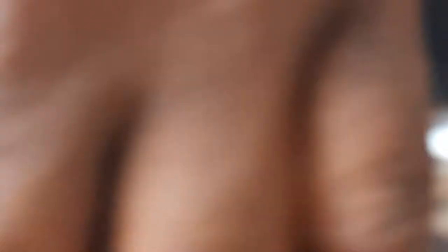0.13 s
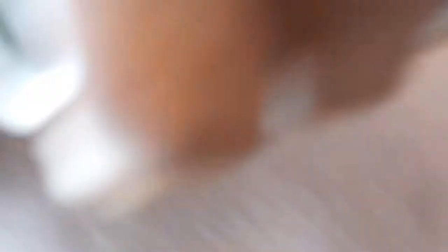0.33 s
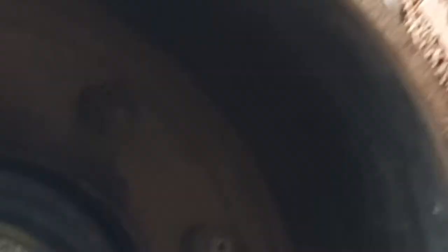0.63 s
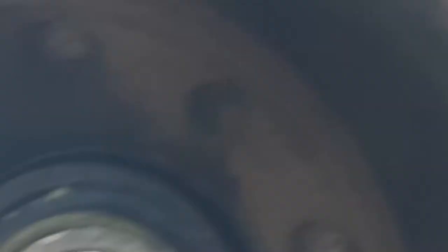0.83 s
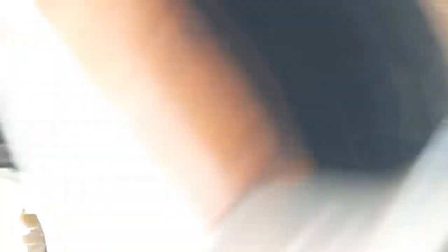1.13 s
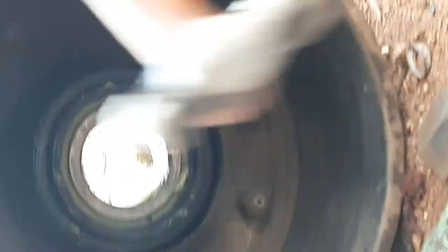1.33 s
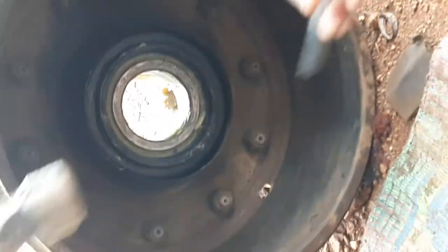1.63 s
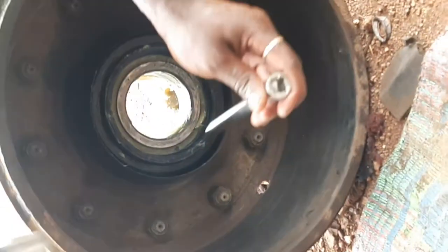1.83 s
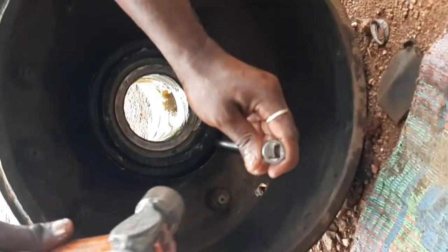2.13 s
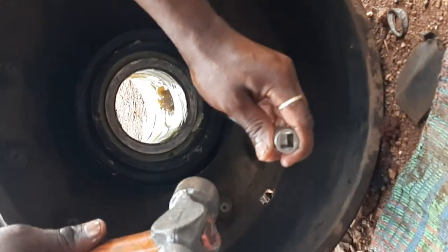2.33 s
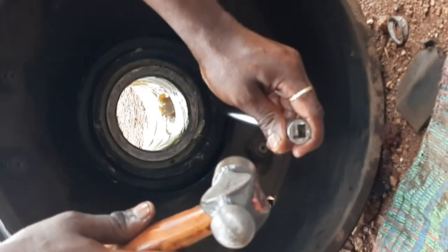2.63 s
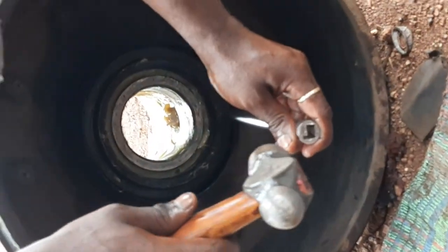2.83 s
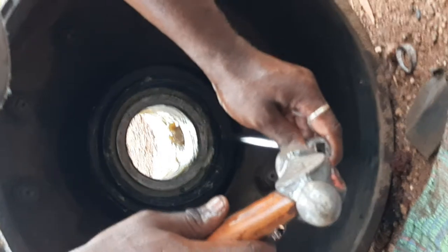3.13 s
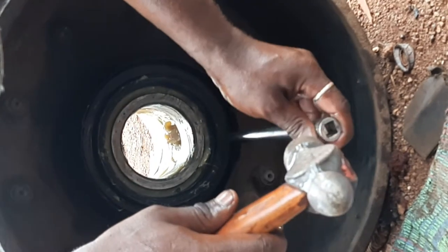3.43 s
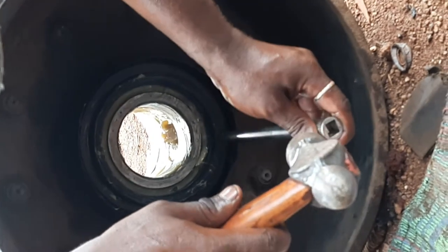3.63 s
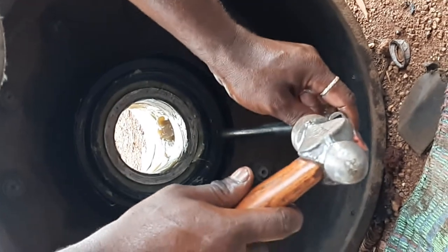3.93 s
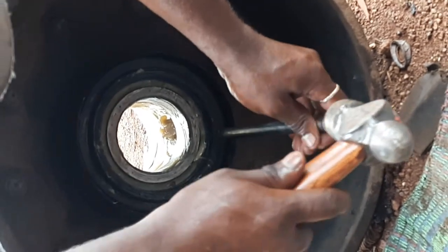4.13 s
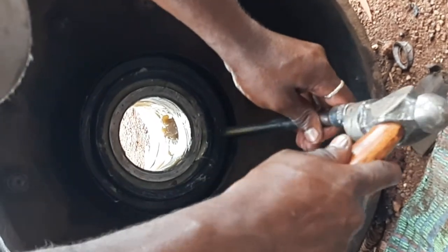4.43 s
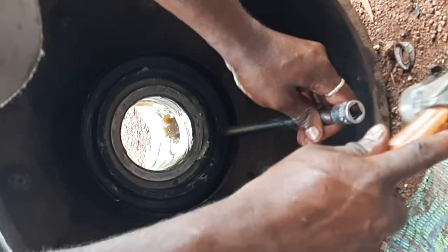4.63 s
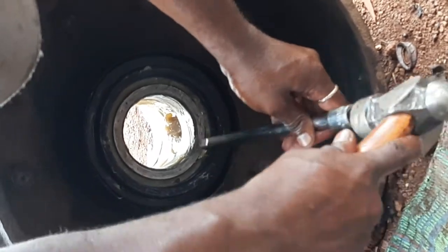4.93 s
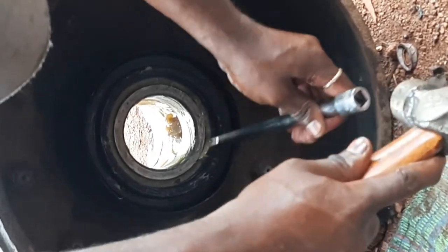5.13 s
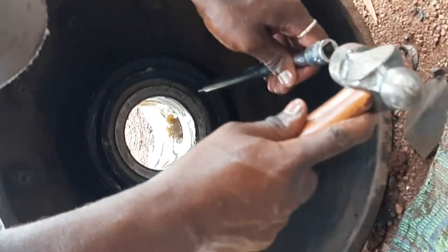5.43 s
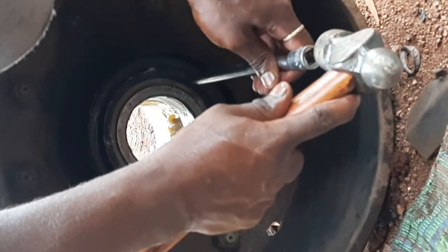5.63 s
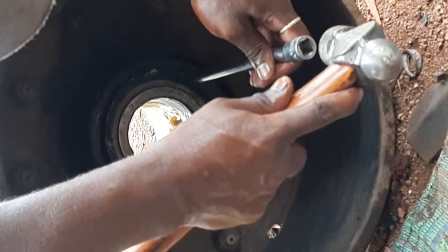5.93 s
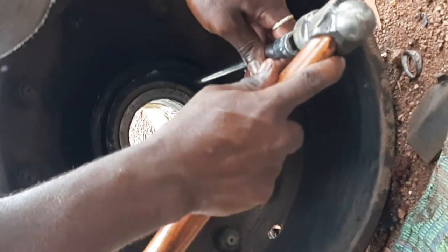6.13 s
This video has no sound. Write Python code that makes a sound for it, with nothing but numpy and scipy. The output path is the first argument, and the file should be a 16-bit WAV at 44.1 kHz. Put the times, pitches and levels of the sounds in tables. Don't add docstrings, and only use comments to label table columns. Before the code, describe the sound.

Close, dry outdoor sound, with low wind rumble and hissy air whose level slowly dips and rises. From 0 to 1 s, fingers rustle, tick and softly thud against the phone, brightest around 0.3-0.8 s. At 1.2 s a hammer hits a steel drift: a loud, sharp clank with a high ring, quickly damped by the grip, and a short hub echo. A faint rising bird chirp comes right after, with weaker ones at 1.6-1.8 s. The background sinks, then returns by 2.5 s with soft bumps. Tiny metal touches come at 2.7, 3.4 and 3.5 s. Two very loud blows land at 4.4 and 4.9 s, the second rattling and ringing longer with a low jolt; a smaller rebound clicks at 5.0 s. The background dips again beneath slight scrapes, then a last lighter clink at 6.1 s is followed by dull handling bumps.

```python
import sys
import numpy as np
from scipy import signal
from scipy.io import wavfile
from scipy.ndimage import uniform_filter1d, minimum_filter1d

SR = 44100
rng = np.random.default_rng(int(sys.argv[2]) if len(sys.argv) > 2 else 0)


def undo_db(level):
    steps = np.asarray(level, float) / 20
    return 10 ** steps


def output_pcm(signal):
    pcm = np.clip(np.atleast_2d(signal).T, -1, 1) * 32767
    wavfile.write(sys.argv[1], SR, np.round(pcm).astype(np.int16))


N = 277389

# (time [s], gain [dB], wind strength [dB])
GAIN_AND_WIND = [(0.0, -3.5, -2), (0.12, 0.5, -5), (0.4, 1.1, -3.5), (0.75, 4.5, -5), (1.05, 5, -5),
                 (1.3, 0, -8.5), (1.42, -4.5, -5.5), (1.701, -11, -0.5), (2.27, -15, 2.5),
                 (2.38, -7.5, 0.5), (2.54, 0, -2), (3.6, -1, 3), (4.451, 0, 1), (4.9, -5, 5),
                 (5.15, -10.5, 1.5), (5.81, -15.5, 2), (6.05, -11, -0.7), (6.2, -3, 2.5)]
# (frequency [Hz], density [dB per Hz])
AIR_COLOUR = [(180, -37), (320, -6), (813, -18.5), (1740, -18.5), (4840, -24.5), (7580, -27), (8600, -36.5),
              (15800, -68.5), (15900, -120)]
# (frequency [Hz], density [dB per Hz])
HISS_COLOUR = [(5060, -29), (8600, -3.5), (15100, -8.5), (15780, -12), (15900, -60.5)]
# (frequency [Hz], density [dB per Hz])
WIND_COLOUR = [(12, -51), (20, -24.5), (109, 2), (189, -0.3), (330, -8), (659, -18), (1200, -21.5),
               (1900, -78)]
# (frequency [Hz], likeness [-1 to 1])
PORT_LIKENESS = [(30, 0.23), (130, 0.86), (300, 0.99), (700, 0.71), (2000, 0.34), (8000, 0.16),
                 (15000, 0.096)]
# (frequency [Hz], width [Hz], boost [dB])
PORT_RESONANCES = [(1320, 270, 3.5), (3710, 320, 3.5), (5000, 670, 3), (7620, 680, 3), (11200, 900, 5)]
PORT_LAG = 10 / 44100
AIR_DB, WIND_DB, HISS_DB = -54.5, -49.5, -75
HISS_SHARE = 0.93
HAND_DB, HAND_UNTIL_S, HAND_LEAVES_S = 5, 0.81, 0.27

# (time [s], length [s], level [dB],
# centre [Hz], width [octaves])
RUBBING = [(0.084, 0.041, -65, 12000, 1.2), (.105, .02, -64, 13600, .05), (0.091, 0.035, -59.5, 5870, .05),
           (0.21, 1, -61, 4350, 0.45), (0.29, 0.088, -61, 7300, 2.5), (0.37, 0.052, -48.5, 2100, 2.5),
           (0.65, 0.025, -58, 5500, 2.2), (0.709, 0.047, -46, 880, 1.7), (0.787, 0.062, -49.5, 9200, 3.3),
           (1.489, 0.081, -72.5, 11960, .6), (5.257, 0.011, -64, 1950, 0.91),
           (5.276, 0.0093, -62.5, 1760, 0.81), (5.468, 0.25, -73, 2500, 0.32),
           (5.504, 0.28, -76, 1880, 0.3), (5.156, 0.022, -73, 2900, .3), (0.782, 0.043, -51.5, 4000, 0.52),
           (0.793, 0.022, -54, 7100, 0.19), (3.28, 0.033, -64, 3100, .3), (5.68, 0.066, -74.5, 1900, .2),
           (1.931, 0.092, -69.5, 830, .4), (2.03, 0.098, -64.5, 760, .9), (2.85, 0.22, -64, 1450, 1.2),
           (.02, 0.092, -78, 1400, 1.7), (2.2, .05, -62, 340, .4), (1.2, .14, -71, 11500, .7),
           (4.43, 0.14, -69, 13000, 0.87), (5.01, .13, -77, 13000, 0.74)]
# (time [s], level [dB])
SKIN_TICKS = [
    (.048, -65),
    (.318, -59),
    (.368, -59),
    (.388, -53),
    (.445, -57),
    (.5, -67),
    (.593, -66),
    (.965, -60),
    (.986, -54),
    (1.032, -67),
]
TICK_S, TICK_HZ, TICK_OCTAVES = 0.0054, 12700, 0.5
# (time [s], peak [dB], frequency [Hz], left-right [dB])
HAND_BUMPS = [(0.519, -34, 185, -3), (0.731, -49, 160, -5), (2.53, -37.5, 165, -2), (2.909, -38.5, 215, -2),
              (3.109, -36, 119, -8), (4.47, -35, 110, -20), (4.524, -33, 129, -16), (4.652, -32, 121, -11),
              (4.781, -45.5, 98, -21), (4.835, -28.5, 133, -3), (4.859, -26.5, 63, 8), (5.116, -45, 124, 7),
              (6.02, -43, 153.7, -11.5), (6.069, -40, 81.5, -10), (6.163, -37, 151, 15),
              (6.208, -31.5, 147, 9), (6.27, -46, 214, -8.5)]

# (time [s], peak [dB], left-right [dB], clatter t60 [s], time until the grip damps the tools [s])
HAMMER_BLOWS = [
    (1.17, -1, -0.5, 0.073, 0.033),
    (2.693, -27, -1.5, 0.047, 0.026),
    (3.425, -31.5, -1.5, 0.076, 0.018),
    (3.519, -40, 1, 0.042, 0.028),
    (4.4013, 5.5, 1, 0.028, 0.034),
    (4.8607, 6, 0, 0.047, 0.03),
    (4.9908, -15, -0.5, 0.043, 0.016),
    (6.122, -12.5, -1, 0.058, 0.036),
]
# (level [dB], t60 [s], left port's lead [radians])
SWING_RINGS = [
    {1138: (-19, 0.055, 0.19), 760: (-30.5, .02, .2), 436: (-42, .15, .1), 4710: (-38, 0.21, 1.1), 5222: (-39, .15, -1.1), 7122: (-35, .1, .6), 4366: (-35.5, 0.29, 4.7), 5599: (-30.5, .1, 0.88), 5885: (-5.5, 0.085, -0.36), 9432: (-25.5, 0.12, 0.96), 9986: (-28, 0.099, -.9), 13547: (-19.5, 0.2, -1.9)},
    {1106: (-42.5, 0.12, -0.32), 2050: (-47, .04, .5), 7250: (-55, .03, .3), 4800: (-46, .06, .6), 1510: (-47, 0.11, 2.6), 3052: (-43, 0.098, -.3), 5020: (-42, 0.04, 0.27), 5290: (-44.5, 0.049, .3)},
    {1128: (-45, 0.13, -.7), 3063: (-52, 0.088, 0.25), 4300: (-43, 0.03, -.7), 4050: (-46, .03, .4), 5450: (-50, 0.04, .3), 7280: (-43, 0.03, .3), 7850: (-47, .025, -.6)},
    {7150: (-53, .025, -.4), 7400: (-55, 0.046, .3)},
]
# (level [dB], t60 [s], left port's lead [radians])
HARD_RINGS = [
    {245: (-31, 0.05, .1), 345: (-29.5, .05, .2), 760: (-29, 0.021, .2), 950: (-22, 0.042, .1), 4610: (-18.5, 0.05, -0.76), 1179: (-15, 0.036, -.1), 1505: (-24.5, 0.041, 1.1), 3100: (-23, 0.12, -1), 4191: (-24.5, 0.069, -1.1), 7149: (-27, .045, .3), 2756: (-26, 0.044, -.6), 7502: (-34, .08, .5), 9425: (-15.5, 0.094, 1.9), 13450: (-30, .075, 1.28), 13180: (-38.5, .07, .4), 12200: (-45, .07, .5)},
    {430: (-32, .025, .2), 900: (-21, 0.022, .2), 1132: (-31, 0.12, -1.4), 1445: (-30, 0.31, 1.36), 2350: (-14.5, 0.0816, 2.2), 3071: (-24.5, 0.19, 1.3), 2580: (-26, 0.044, 0.53), 4140: (-25.5, 0.2, -0.632), 5510: (-26.5, .2, .5), 6100: (-13, 0.069, -0.33), 7504: (-28, 0.2, 0.52), 9426: (-29.5, 0.47, -2.5), 10150: (-33, 0.33, 6.9), 13544: (-29.5, 0.2, 0.54)},
]
# (level [dB], t60 [s], left port's lead [radians])
LIGHT_RINGS = [
    {1132: (-48, 0.27, -.2), 520: (-38, 0.055, .2), 870: (-42, .04, .2), 3063: (-26, 0.42, 2.16), 2000: (-28, 0.011, .3), 5885: (-28, 0.1, 0.89), 9420: (-48, 0.11, .6), 10160: (-42, 0.21, 1.6), 13540: (-43, .08, -.5)},
    {1500: (-27, 0.054, -1.4), 2140: (-27, 0.035, 0.34), 2490: (-23.5, 0.059, -2.5), 2970: (-24, 0.035, -0.49), 3970: (-29, 0.025, .4), 5120: (-32.5, 0.035, .6), 250: (-41, 0.098, .1), 950: (-25.5, 0.02, -0.25), 680: (-36, 0.042, 0.1), 790: (-35, .04, .2), 1120: (-40, 0.045, -.3), 6764: (-50, .05, .5), 4390: (-21.5, 0.032, .1), 6100: (-23, 0.034, 1.46), 9360: (-40, 0.079, -.4), 8220: (-40, 0.047, .3)},
]
# (frequency [Hz], density [dB per Hz])
CLATTER_COLOURS = [
    [(100, -44), (750, -21), (2300, -26.5), (4800, -16), (5900, -8.5), (7200, -20.5), (8500, -43),
     (10000, -24), (14200, -32.5), (15200, -52.5)],
    [(530, -36), (900, -12), (2750, -7), (3060, -30), (4410, -12), (5200, -18), (15000, -34)],
    [(530, -36), (900, -15), (1100, -14), (3100, -9), (6430, -16), (7320, -13), (15000, -37)],
    [(1180, -34), (2000, 3), (5980, -15), (7330, -11), (15000, -26)],
    [(100, -28), (200, -10.5), (538, -15.5), (2450, -5), (4350, -9), (6200, -17.5), (13600, -30.5),
     (14800, -60)],
    [(120, -37), (220, -2.5), (1740, -14), (2290, -5.5), (6050, -8), (8740, -23), (14300, -17),
     (16000, -41.5)],
    [(450, -7), (750, -14), (1900, -4), (5310, -11.5), (5970, -6), (8700, -24), (13800, -38), (16000, -55)],
    [(240, -44), (400, -28), (3530, -7), (5520, -19), (6150, -11), (10500, -21), (12500, -46), (15000, -86)],
]
DRIFT_BOUNCES = {0: [(.015, -14.5), (.026, -13.5)], 1: [(.005, -12)], 2: [(.008, -12)], 4: [(.002, 1.5),
                 (.012, -11.5), (.025, -16.5)], 5: [(.006, -9), (.017, -6.5), (.0225, -12.5), (.028, -8),
                 (.033, -19), (.043, -3.5), (.052, -3)], 7: [(.008, -26), (.035, -33)]}
HUB_MODES = {465: (-24, .3), 545: (-14, .14), 3421: (-12, .17), 3500: (-8, .17), 3583: (-2, .22),
             3655: (-1, .23), 3692: (-3, .22), 3780: (-6, .2), 3865: (-6, .18), 4160: (-11, .15)}
# (thump against blow [dB], thump delay [s], hub ring [dB], top of the rattle [Hz])
BLOW_DRIVE = [
    (-22, 0.0022, -58.5, 12000),
    (-23, .0012, -80, 9000),
    (-17, 0.0015, -85, 7600),
    (-25, .0012, -90, 9000),
    (-29, 0.0012, -38.5, 14000),
    (-19, 0.0014, -18, 14800),
    (-28, .0012, -46.5, 9000),
    (-42, .0012, -67.5, 5600),
]
DAMPING, LEFT_DB = 930, -32.5
# (time [s], rise [s], time until damped [s],
# frequency [Hz] -> (level [dB], t60 [s], left port's lead [radians]))
FURTHER_RINGS = [
    (4.4013, 0.0014, .05, {2540: (-1.5, 0.027, 0.72), 5865: (-8.5, 0.05, -.2)}),
    (1.1702, 0.00035, 0.042, {3063: (-14, .24, .42)}),
    (1.185, 0.0065, 0.074, {9380: (-41.5, 0.17, 1.1), 13540: (-37, 0.14, -1.5), 13650: (-42, .15, 0.67), 11890: (-52, .12, .4), 5890: (-34.5, .15, -.4)}),
    (4.42, 0.0056, .09, {5860: (-32.5, 0.082, -.2), 3600: (-42.5, .25, 0.87), 13430: (-50, .12, 1), 9430: (-49, 0.086, 1.4), 12200: (-59, 0.13, 0.394)}),
    (4.8765, 0.0011, 0.023, {2360: (-19.5, .08, 1.5), 3590: (-19, .09, -.6), 4100: (-22.5, .08, 1.1), 5885: (-19.5, 0.11, 0.53), 1136: (-23.5, .09, -0.64), 6600: (-21.5, 0.0584, 0.79), 13540: (-30, .09, .6)}),
    (4.905, 0.0016, 0.043, {3640: (-28.5, 0.16, .3), 3070: (-32.5, .1, 1.1), 5500: (-37, 0.087, .6), 6050: (-36, .1, -.6)}),
    (6.14, .003, 0.018, {6000: (-43, 0.11, 1.2)}),
    (6.1257, 0.002, 0.19, {3070: (-20, 0.14, -2.54), 11970: (-40, .06, .32), 13571: (-27, 0.058, .1)}),
                 (1.271, .015, 0.058, {5908: (-54, .9, -.4), 3063: (-57, 0.7, .3)}),
    (4.41, .005, 0.046, {1495: (-28, 0.22, 0.6), 3100: (-43.5, .2, 0.33)}),
    (4.866, 0.007, 0.027, {3232: (-25.5, .15, .5), 3390: (-30, .15, -0.521), 4020: (-31.5, .12, 1.204), 4370: (-21, 0.07, -0.84), 4800: (-33, .15, .6), 5250: (-29.5, .15, 1.5), 5890: (-19.5, 0.13, .3), 6620: (-29.5, 0.086, -0.45)}),
    (4.89, .015, .085, {7472: (-56.5, .25, .5), 8231: (-63.5, .25, -0.71), 11040: (-53.5, 0.31, 1.2), 11990: (-56, 0.27, 0.465), 13570: (-53, 0.225, .5), 14350: (-64, 0.38, -.6)}),
    (4.911, 0.007, .2, {465: (-46, .26, .2)}),
    (5.008, 0.004, .07, {3063: (-40, 0.12, 1.6), 13540: (-74, .3, 1.1)}),
]
# (time [s], peak [dB], left [Hz], right [Hz])
PHONE_JOLTS = [
    (1.1703, -29, 200, 260),
    (4.8607, -12.5, 130, 158),
]
# (frequency [Hz], t60 [s])
HUB_DECAY = [(300, 0.5), (1500, 0.21), (2500, 0.17), (3100, 0.12), (4000, 0.26), (8000, 0.15),
             (15000, 0.044)]
# (time [s], length [s], from [Hz], to [Hz], level [dB])
BIRD_CHIRPS = [
    (1.253, 0.083, 3730, 5200, -61),
    (1.621, 0.06, 3535, 5000, -70),
    (1.706, .06, 3640, 4970, -71),
    (1.77, .025, 5500, 6300, -78.5),
]


def evened(x):
    return x / np.sqrt(np.mean(x ** 2) + 1e-20)


def read(points, hz):
    f, value = np.transpose(points)
    return np.interp(np.log(hz + 1), np.log(f + 1), value)


def add(mix, s, sound):
    part = mix[:, round(s * SR):][:, :sound.shape[-1]]
    part += sound[..., :part.shape[1]]


def panned(pan_db):
    return np.array([[.5], [-.5]]) * pan_db


def coloured(x, gain_db):
    log_gain = np.log(undo_db(np.maximum(gain_db, -100)))
    circle = np.r_[log_gain, log_gain[-2:0:-1]]
    taps = np.fft.ifft(np.exp(np.conj(signal.hilbert(circle)))).real
    return signal.fftconvolve(x, taps[None], axes=1)[:, :x.shape[1]]


def bed(spectrum, level_db, patchy_db, gust_db, size):
    hop = size // 4
    frames, hz = N // hop + 5, np.fft.rfftfreq(size, 1 / SR)
    a, b, c, d, patches = rng.standard_normal((frames, len(hz), 5)).T
    patches = uniform_filter1d(patches, size=6, axis=0)
    patches = evened(uniform_filter1d(patches, size=10, axis=1))
    gusts = evened(uniform_filter1d(rng.standard_normal(frames), size=3))
    same = np.clip(read(PORT_LIKENESS, hz), -1, 1)[:, None]
    lag = np.exp(-2j * np.pi * hz * PORT_LAG)[:, None]
    left = a + 1j * b
    right = same * lag * left + np.sqrt(1 - same ** 2) * (c + 1j * d)
    colour_db = read(spectrum, hz)[:, None] + patchy_db * patches + gust_db * gusts
    z = np.array([left, right]) * undo_db(colour_db)
    noise = signal.istft(z, nperseg=size, noverlap=size - hop)[1][:, :N]
    return evened(noise) * undo_db(level_db)


def air_and_hiss(t, gain_db):
    hand_db = HAND_DB * np.clip(1 - (t - HAND_UNTIL_S) / HAND_LEAVES_S, 0, 1)
    air = bed(AIR_COLOUR, AIR_DB + gain_db, patchy_db=2.0, gust_db=0.43, size=512)
    hiss_db = HISS_DB + HISS_SHARE * gain_db + hand_db
    air += bed(HISS_COLOUR, hiss_db, patchy_db=0.0, gust_db=1.0, size=256)
    hz = np.fft.rfftfreq(2048, 1 / SR)
    boost_db = sum(db / (1 + (2 * (hz - f) / width) ** 2) for f, width, db in PORT_RESONANCES)
    return coloured(air, boost_db)


def wind_rumble(gain_db, strength_db):
    rumble = bed(WIND_COLOUR, WIND_DB + gain_db + strength_db, patchy_db=0.0, gust_db=1.44, size=1024)
    return undo_db(panned(-1.6)) * rumble


def rub(length, db, centre_hz, octaves):
    n, hz = round(length * SR), np.fft.rfftfreq(2048, 1 / SR)
    grains = rng.standard_normal((SR, 3))[:n].T
    clumps_db = 2.0 * evened(uniform_filter1d(grains[2], size=60))
    grains = (grains[:2] + grains[2]) * undo_db(clumps_db)
    band = -6 * (np.log2((hz + 1) / centre_hz) / (octaves / 2)) ** 2
    return undo_db(db) * evened(coloured(grains, band)) * np.hanning(n)


def skin_tick(db):
    return rub(TICK_S, db, TICK_HZ, TICK_OCTAVES)


def bump(db, hz, pan_db):
    t = np.arange(SR // 20) / SR
    swell = t * hz * np.exp(1 - t * hz / 0.56)
    return undo_db(db - 0.5 + panned(pan_db)) * np.sin(2 * np.pi * hz * t) * swell


def ring(t, modes, rise):
    f = np.array(list(modes))[:, None]
    db, t60, lead = np.array(list(modes.values())).T[:, :, None]
    phase = 2 * np.pi * f * t + np.array([lead, 0 * lead]) + rng.uniform(0, 2 * np.pi, f.shape)
    second = phase * 1.006 + rng.uniform(0, 2 * np.pi, (2, len(f), 1))
    wobble = evened(uniform_filter1d(rng.standard_normal((len(t), len(f), 2)).T, size=250))
    wobble *= 1 - np.exp(-t / 0.012)
    pair = np.sin(phase + .35 * wobble) * undo_db(2.2 * wobble[::-1]) + .25 * np.sin(second)
    decaying = undo_db(db - 60 * t / t60) * pair
    return decaying.sum(1) * (1 - np.exp(-t / rise)) ** 2


def hub_ring(t, hub_db):
    modes = {}
    for hz, (db, t60) in HUB_MODES.items():
        modes[hz] = (hub_db + db, t60, hz / 1800 * rng.uniform(-0.91, 1))
    return ring(t, modes, 0.02)


def clatter(t, t60, rattle_hz, colour, bounces):
    burst = undo_db(-60 * t / t60) * (1 - np.exp(-t / 0.00066))
    touch = burst * (1 - np.exp(-t / .002))
    after = sum(undo_db(db) * np.interp(t - delay, t, touch, left=0) for delay, db in bounces)
    after *= undo_db(3.0 * evened(uniform_filter1d(rng.standard_normal(len(t)), size=50)) - 1.5)
    noise = rng.standard_normal((2, len(t)))
    noise += signal.lfilter(*signal.butter(2, 900, fs=SR), noise[0] - noise)
    noise = evened(coloured(noise, read(colour, np.fft.rfftfreq(2048, 1 / SR))))
    bass = signal.filtfilt(*signal.butter(2, 1050, fs=SR), noise)
    noise -= bass * (1 - np.exp(-t / 0.012))
    light_band = signal.butter(2, [1200, rattle_hz], "band", fs=SR, output="sos")
    return burst * noise + after * signal.sosfilt(light_band, noise)


def thump(t, delay):
    u = (t - delay) / 0.0004
    return -np.exp(-u ** 2) + 1.7 * np.exp(-((u - 2.3) / 1.1) ** 2)


def blow(row, modes, thump_db, thump_s, hub_db, rattle_hz, colour, bounces):
    s, peak_db, pan_db, clatter_t60, held = row
    t = np.arange(SR // 4) / SR
    hub = hub_ring(t, hub_db)
    burst = undo_db(peak_db - 11.5) * clatter(t, clatter_t60, rattle_hz, colour, bounces)
    grip = undo_db(-DAMPING * np.maximum(t - held, 0)) + undo_db(LEFT_DB)
    sound = (ring(t, modes, 0.00029) + burst) * grip
    sound += hub + undo_db(peak_db + thump_db) * thump(t, thump_s)
    return undo_db(panned(pan_db)) * sound


def late_ring(rise, held, modes):
    t = np.arange(SR // 4) / SR
    return ring(t, modes, rise) * undo_db(-DAMPING * np.maximum(t - held, 0))


def jolt(db, left_hz, right_hz):
    turns = np.array([[left_hz], [right_hz]]) * np.arange(SR // 40) / SR
    swing = np.sin(2 * np.pi * turns) * np.exp(-((turns - .6) / .65) ** 2)
    return undo_db(db) * np.array([[-1], [1]]) * swing


def hub_echo(x):
    taps = np.zeros((2, SR // 2))
    slots = np.arange(100, SR // 2 - 20, 20)
    at = slots + rng.integers(0, 20, (2, len(slots)))
    np.put_along_axis(taps, at, rng.choice([-1., 1.], at.shape), 1)
    hz, t, z = signal.stft(taps, SR, nperseg=256)
    z = z * undo_db(-60 * t / read(HUB_DECAY, hz)[:, None])
    tail = signal.istft(z, SR, nperseg=256)[1]
    return signal.fftconvolve(x, tail / np.linalg.norm(tail[0]), axes=1)[:, :N]


def chirp(length, from_hz, to_hz, db):
    n = round(length * SR)
    wobble = uniform_filter1d(rng.standard_normal((4096, 2))[:n].T, size=80)
    turns = np.cumsum(np.linspace(from_hz, to_hz, n)) / SR
    whistle = np.sin(2 * np.pi * turns + 3.6 * wobble)
    return undo_db(db) * (1 + 3.0 * wobble) * whistle * np.hanning(n) ** .5


def scene():
    t, (when, gain_db, strength_db) = np.arange(N) / SR, np.transpose(GAIN_AND_WIND)
    gain_db, strength_db = np.interp(t, when, gain_db), np.interp(t, when, strength_db)
    background = air_and_hiss(t, gain_db) + wind_rumble(gain_db, strength_db)

    blows, small = np.zeros((2, 2, N))
    for source, events in [(rub, RUBBING), (skin_tick, SKIN_TICKS), (bump, HAND_BUMPS),
                           (jolt, PHONE_JOLTS), (chirp, BIRD_CHIRPS)]:
        for s, *row in events:
            add(small, s, source(*row))

    rings = SWING_RINGS + HARD_RINGS + LIGHT_RINGS
    for k, row in enumerate(HAMMER_BLOWS):
        bounces = DRIFT_BOUNCES.get(k, [])
        add(blows, row[0], blow(row, rings[k], *BLOW_DRIVE[k], CLATTER_COLOURS[k], bounces))
    for s, *row in FURTHER_RINGS:
        add(blows, s, late_ring(*row))
    return blows + undo_db(-19.5) * hub_echo(blows) + small + background


def band_limit(x):
    return signal.sosfilt(signal.butter(12, 16430, fs=SR, output="sos"), x)


def record(dry):
    cut = signal.sosfilt(signal.butter(2, 45, "high", fs=SR, output="sos"), dry)
    excess = np.maximum(abs(cut) / .97, 1)
    held_excess = -minimum_filter1d(-excess, size=61)
    limited = cut / uniform_filter1d(held_excess, size=31)
    mix = signal.oaconvolve(limited, signal.firwin(255, 15900, fs=SR)[None], "same")
    return band_limit(mix)


dry = scene()
out = record(dry)
output_pcm(out)
```